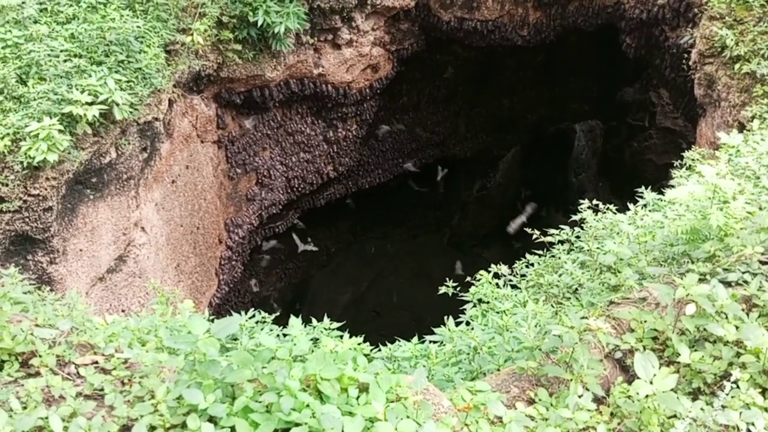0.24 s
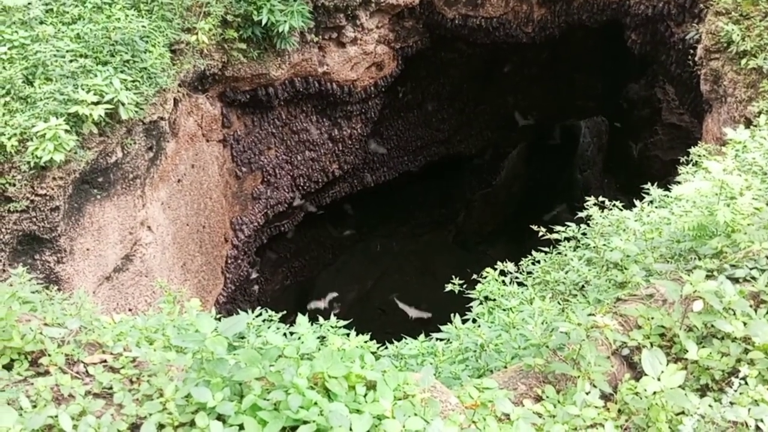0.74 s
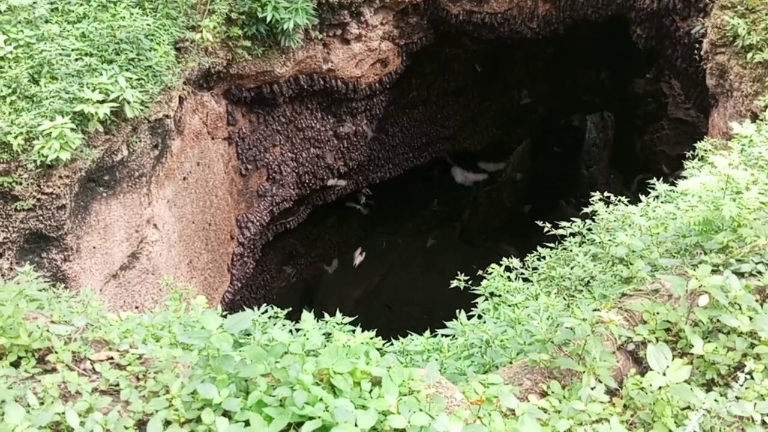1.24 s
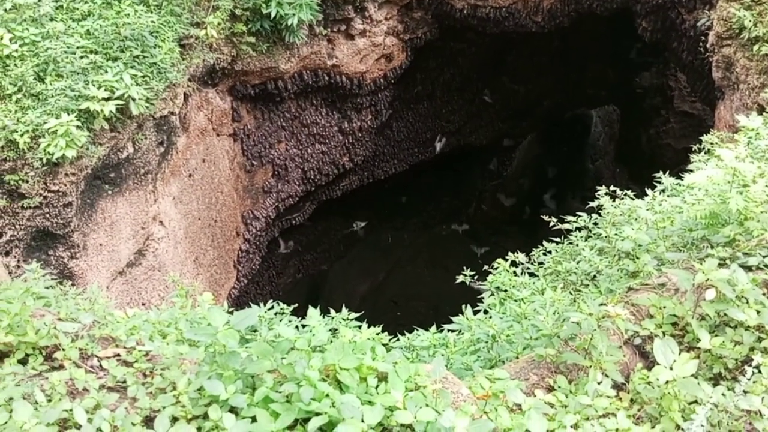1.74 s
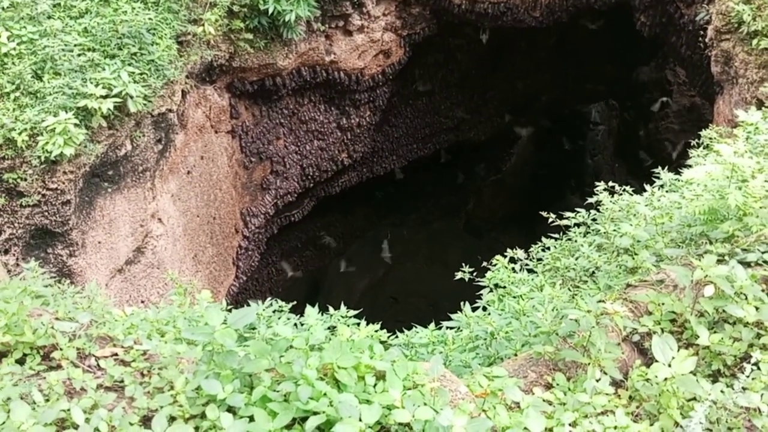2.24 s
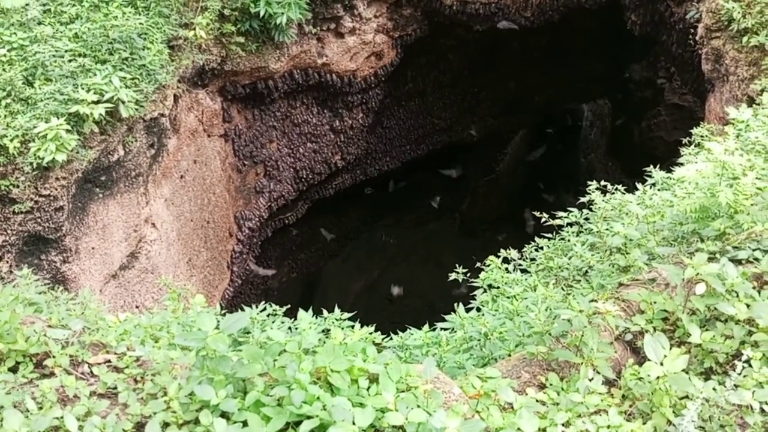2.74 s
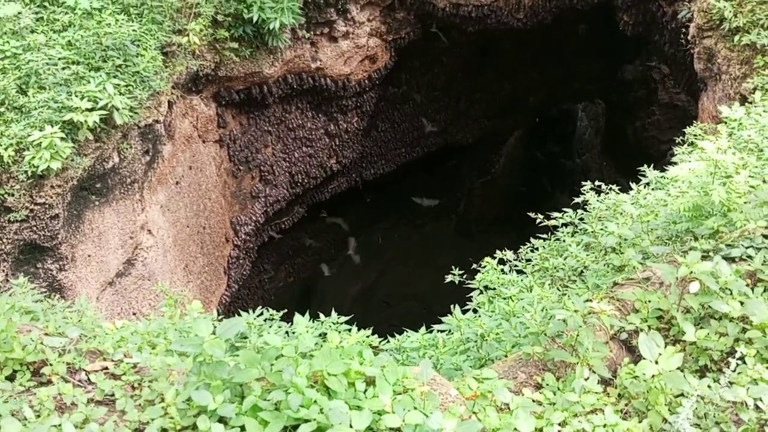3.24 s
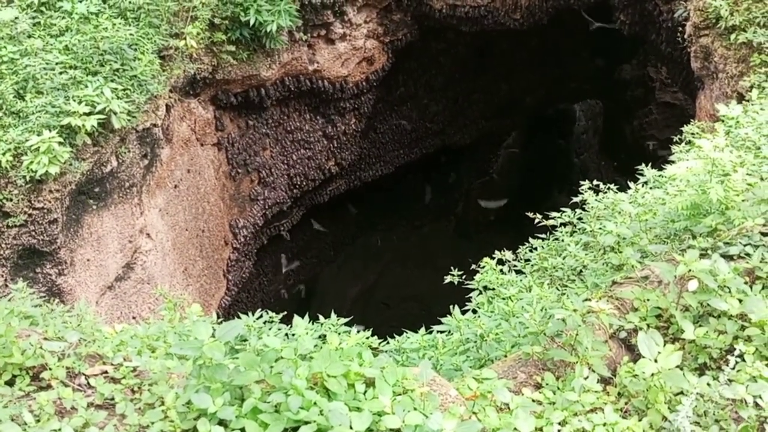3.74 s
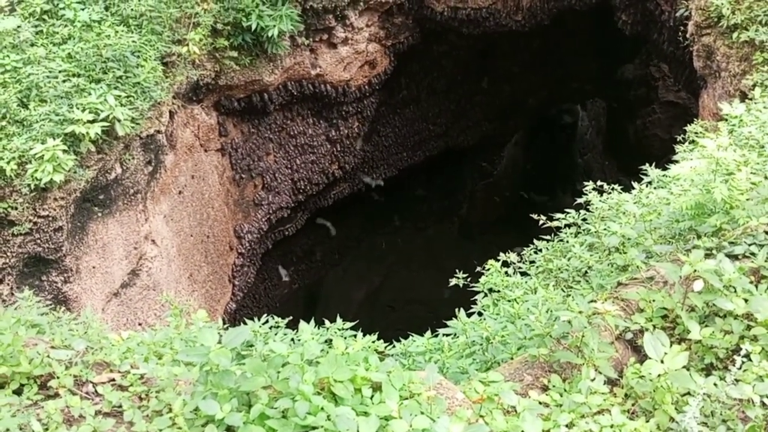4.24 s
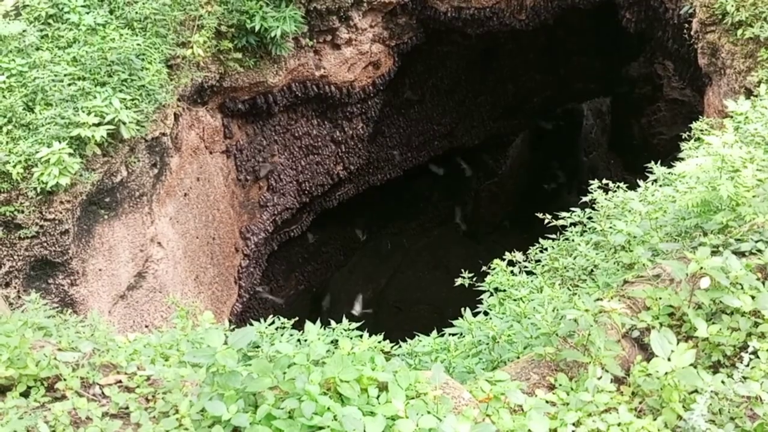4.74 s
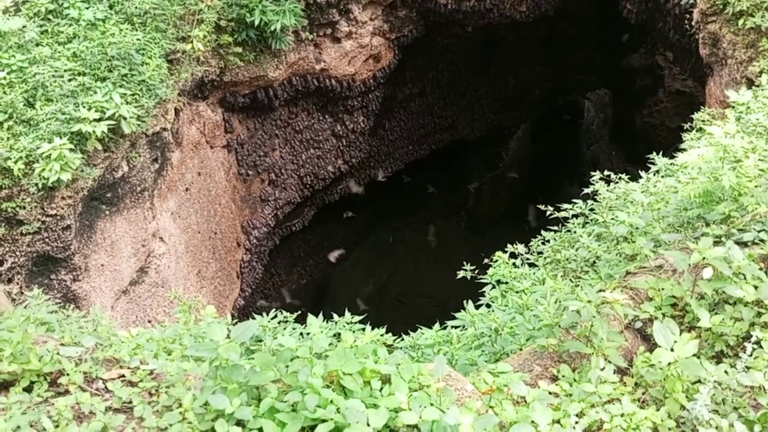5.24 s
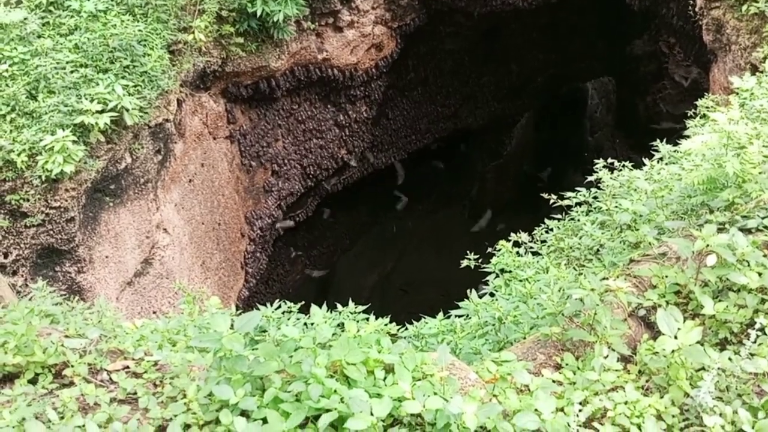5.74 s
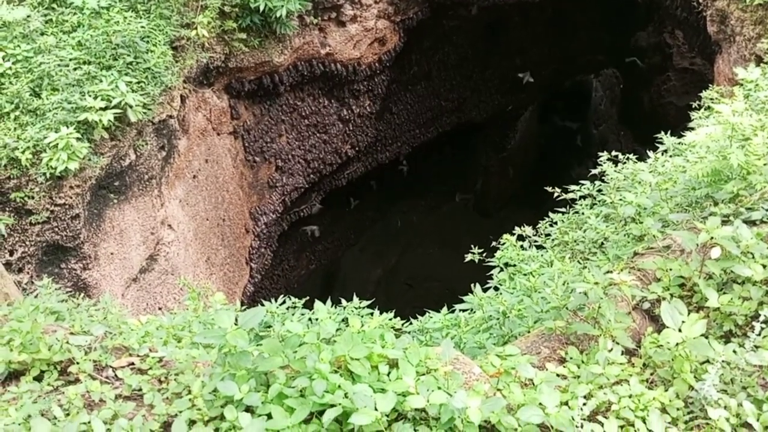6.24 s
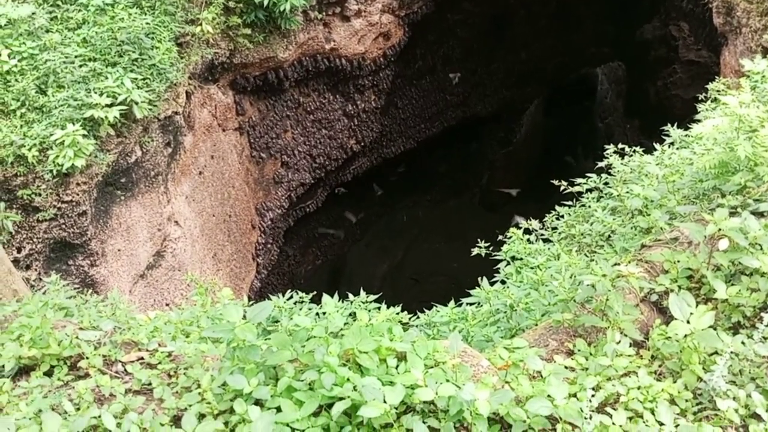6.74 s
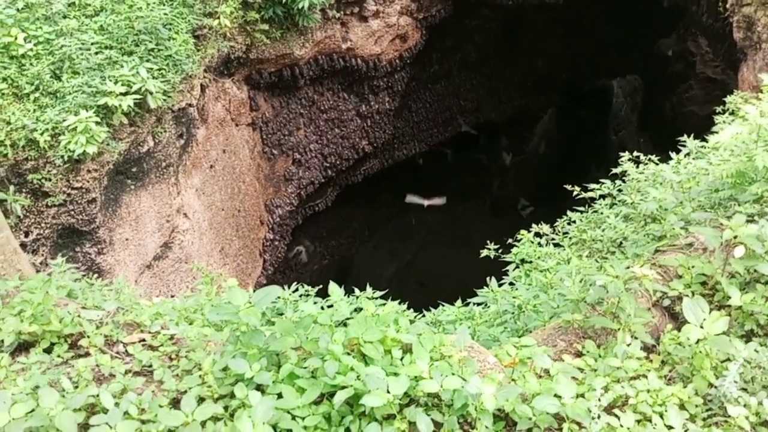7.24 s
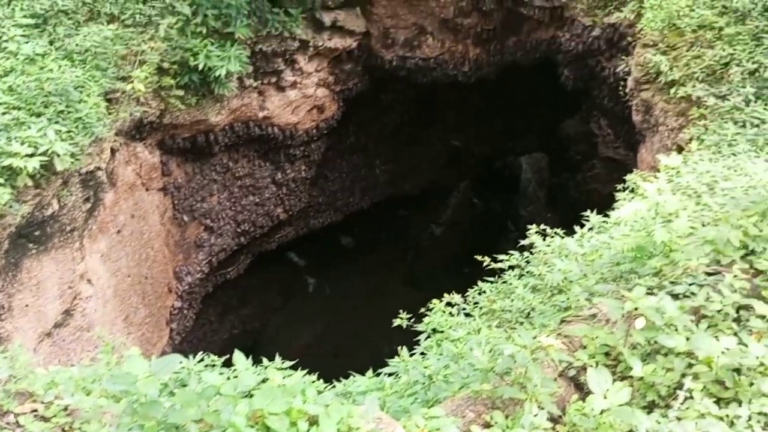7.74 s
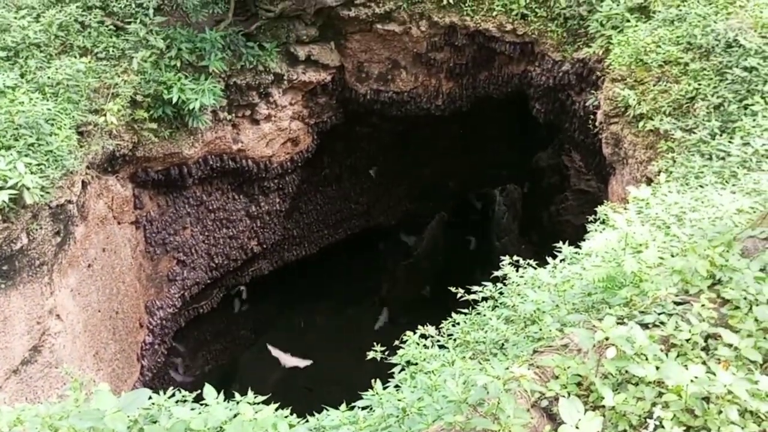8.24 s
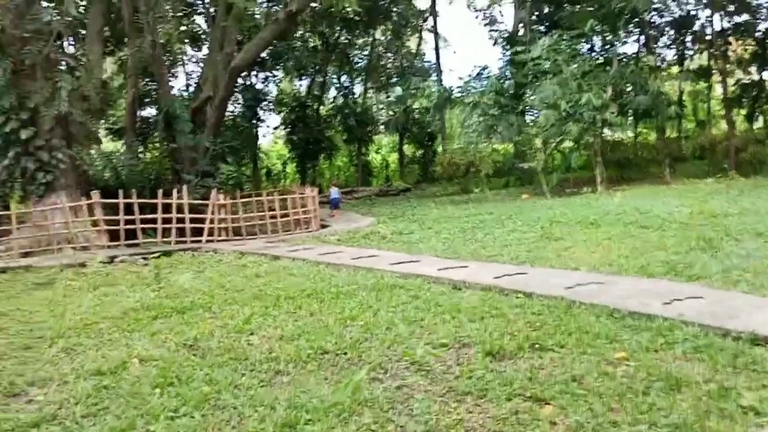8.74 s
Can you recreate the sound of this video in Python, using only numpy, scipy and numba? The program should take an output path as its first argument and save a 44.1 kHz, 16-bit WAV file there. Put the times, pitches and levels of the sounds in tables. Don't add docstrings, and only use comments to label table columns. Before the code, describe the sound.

Thousands of bats screech and twitter in a rocky hollow over faint motor drone; one sharp snap, then the chatter turns duller from further away.

```python
import sys
import numpy as np
from scipy import signal
from scipy.fft import rfft, irfft, next_fast_len
from scipy.io import wavfile
from scipy.ndimage import uniform_filter1d
from numba import njit

SR = 44100
rng = np.random.default_rng(int(sys.argv[2]) if len(sys.argv) > 2 else 0)


def persist_wave(psi):
    counts = np.round(np.clip(psi, -1, 1) * 32767).astype(np.int16)
    wavfile.write(sys.argv[1], SR, np.atleast_2d(counts).T)


def how_loud(loudness_db):
    steps = np.asarray(loudness_db, float) / 20
    return 10 ** steps


N = 395577

T = np.arange(N) / SR
SIZE = next_fast_len(N)
HZ = np.maximum(np.fft.rfftfreq(SIZE, 1 / SR), 1)
TURN_S = 7.15
MOVE_S, LEAVE_S = 8.323, 8.55
FLANK_SHARE = 0.52


def level(x, db):
    return x * how_loud(db) / np.sqrt(np.mean(x ** 2))


def colour(x, points):
    hz, db = np.transpose(points)
    gain = how_loud(np.interp(np.log(HZ), np.log(hz), db))
    return irfft(rfft(x, SIZE) * gain, SIZE)[:N]


def band(x, lo_hz, hi_hz):
    def edge(hz):
        return np.sin(np.pi / 4 * (1 + np.clip(5 * np.log2(HZ / hz), -1, 1))) ** 2

    return irfft(rfft(x, SIZE) * edge(lo_hz) * (1 - edge(hi_hz)), SIZE)[:N]


def walk(rate):
    k = int(SR / rate)
    held = np.repeat(rng.standard_normal(N // 400 + 2)[:N // k + 1], k)
    w = uniform_filter1d(uniform_filter1d(held, k), k)[:N]
    return w / w.std()


def swell(s, length):
    return np.exp(-(2 * (T - s) / length) ** 2)


def echo(x, t60, damp_hz, rise=0.075):
    hop, t = SR // 4, T[:int(.7 * SR)]
    out = np.zeros(len(x) + 2 * SR)
    fade = np.sin(np.pi * np.arange(2 * hop) / (2 * hop))
    padded = np.pad(x, (hop, 2 * hop))
    for i in range(0, len(x) + hop, hop):
        envelope = np.exp(-np.log(1000) * t / t60) * (1 - np.exp(-t / rise))
        tail = rng.standard_normal(len(t)) * envelope
        tail = signal.lfilter([1], [1, -np.exp(-2 * np.pi * damp_hz / SR)], tail)
        tail = tail / np.sqrt(np.sum(tail ** 2))
        rung = signal.fftconvolve(padded[i:i + 2 * hop] * fade, tail)
        out[i:i + len(rung)] += rung
    return out[hop:hop + len(x)]


# f/Hz, level/dB rms
MOTOR_LINES = [(57.9, -66), (71.5, -85), (90.2, -68), (94.2, -56.5), (108.7, -59), (115.7, -67),
               (126.5, -75), (144, -71), (162.8, -59), (172.3, -74), (188.4, -88)]


def motors():
    drift = np.cumsum(1 + 0.00429 * walk(0.649)) / SR
    out = 0
    for hz, db in MOTOR_LINES:
        cycles = hz * drift + .1 * walk(6)
        out = out + np.sqrt(2) * how_loud(db + 2.2 * walk(7)) * np.sin(2 * np.pi * cycles)
    return out


# f/Hz, level/dB per Hz
MURMUR_COLOUR = [(18, -49), (30, -19), (44, -16), (64, -15.5), (97, 4.5), (129, -4.5), (216, -8),
                 (253, -25.5), (424, -29), (489, -28.5), (616, -12.5), (804, 0.5), (978, -4.5), (1320, -14),
                 (2100, -12.5), (2730, -31), (4620, -120)]
# centre t/s, level/dB, length t/s
AIR_HUSHES = [
    (.3, 2, 0.79),
    (2.5, -2, 0.99),
    (3.9, -3, 0.86),
    (5.9, -1.5, 0.26),
    (7.7, -1, .4),
]


def murmur(db):
    air = colour(rng.standard_normal(N), MURMUR_COLOUR)
    air = air / np.std(band(air, 580, 1100))
    boom = how_loud(db + walk(14)) * band(air, 560, 1150)
    around_db = np.select([T < MOVE_S, T < LEAVE_S], [-47.5, -43.5], -48.5) + walk(3.076)
    hush_db = sum(d * swell(s, length) for s, d, length in AIR_HUSHES)
    around = band(air, 223.5, 531) + how_loud(hush_db) * band(air, 1210, 2230)
    rumble = how_loud(-46.5) * band(air, 20, 206.5)
    return boom + how_loud(around_db) * around + rumble


# t/s from its top note, f/Hz, level/dB
WHISTLE_PHRASE = [
    (-.19, 1420, 11),
    (-.135, 1540, 12),
    (-.11, 1490, 10),
    (-.085, 1332, 13),
    (-.04, 1520, 13),
    (0, 1652, 20),
    (.025, 1487, 19),
    (.075, 1220, 14.5),
    (.115, 1026, 8),
]
# top note t/s, pitch factor, level/dB, stretch of the climb, opening f/Hz, falling end level/dB
WHISTLE_CALLS = [
    (-.07, 0.92, -57.5, 0.9, 1393, 1),
    (.545, 0.98, -55.5, .95, 1370, -3),
    (6.285, .93, -59.5, 1.16, 1050, -5),
    (7.125, 1., -56, 0.883, 1440, -9),
    (7.95, 1.025, -56.5, 1.02, 1390, 0.5),
]


def bird(early=0.5):
    s, hz, db = np.transpose(WHISTLE_PHRASE)
    t = np.arange(-int(early * SR), N) / SR
    song = 0
    for top, factor, call_db, slow, first_hz, end_db in WHISTLE_CALLS:
        times = np.where(s < 0, slow * s, s)
        pitch = uniform_filter1d(np.interp(t - top, times, np.r_[first_hz, hz[1:]]), size=600)
        phase = 2 * np.pi * np.cumsum(factor * pitch) / SR
        note_db = db + call_db + end_db * np.clip(s / .075, 0, 1.5)
        loudness = how_loud(np.interp(t - top, times, note_db, -150, -150))
        song = song + uniform_filter1d(loudness, size=500) * np.sin(phase)
    slap = how_loud(-10 + 3.0 * walk(35)) * np.roll(song, int(.04 * SR))[-N:]
    trees = echo(song, 1.2, 6000, rise=.006)[-N:]
    return how_loud(2.4 * walk(45) - 4.5) * song[-N:] + how_loud(-2) * slap + how_loud(-5) * trees


def knock(s, db, hz, width, decay):
    out, t = np.zeros(N), T[:SR // 2]
    edges = [max(hz - width / 2, 40), hz + width / 2]
    sos = signal.butter(2, edges, "bandpass", fs=SR, output="sos")
    noise = level(signal.sosfilt(sos, rng.standard_normal(len(t))), db)
    burst = noise * np.exp(-t / decay) * (1 - np.exp(-t / 0.0071))
    i = int(s * SR)
    out[i:i + len(t)] = burst[:N - i]
    return out


def snap(s, db, from_hz, to_hz, rise):
    t = np.clip(T - s, 0, 40 * rise)
    fall = .7 * rise
    phase = 2 * np.pi * (to_hz * t + (from_hz - to_hz) * fall * (1 - np.exp(-t / fall)))
    return how_loud(db) * t / rise * np.exp(1 - t / rise) * np.sin(phase)


# t/s, peak level/dB, centre f/Hz, width f/Hz, decay t/s
SOFT_KNOCKS = [(1.491, -52, 245, 187, 0.039), (2.781, -56, 247, 144, 0.03), (4.42, -43.5, 230, 177, 0.042),
               (4.551, -73, 315, 302, 0.12), (4.80, -46, 213, 179, 0.081), (4.901, -77, 400, 302, 0.058),
               (6.622, -65, 460, 250, 0.1), (6.9, -89, 348, 300, 0.098), (7.487, -34, 346, 303, 0.0092),
               (7.519, -49, 265, 190, 0.062), (8.12, -61, 392, 350, 0.26), (8.335, -39, 433, 196, 0.017),
               (8.45, -65, 348, 250, 0.11), (8.65, -72, 400, 310, 0.11), (8.876, -42, 428, 150, 0.018),
               (8.94, -53, 330, 202, .04)]
# t/s, peak level/dB, first f/Hz, last f/Hz, rise t/s
FINGER_THUMPS = [
    (4.418, -34, 300, 190, .003),
    (4.7956, -34.5, 298, 190, 0.0044),
]
# t/s, peak level/dB, first f/Hz, last f/Hz, rise t/s
SHARP_SNAP = (7.48712, -3.5, 5500, 800, .00015)
# t/s, peak level/dB, first f/Hz, last f/Hz, rise t/s
GROUND_RETURN = (7.4935, -17, 1630, 250, .0006)


def impacts():
    knocks = sum(knock(*k) for k in SOFT_KNOCKS)
    crack = band(snap(*GROUND_RETURN) - snap(*SHARP_SNAP), 90, 21000)
    thumps = sum(snap(*k) for k in FINGER_THUMPS)
    return knocks + crack - thumps


# t/s, level/dB re usual
COLONY_ACTIVITY = [(0, -0.5), (.12, -1), (1.3, -1), (2.0, 0), (2.8, -0.5), (3.4, 0.8), (4.0, -1),
                   (5.0, 1.1), (5.8, 0), (6.2, -1.5), (6.8, -0.9), (7.3, -2), (8.0, -2), (8.97, -2.5)]
# centre t/s, throat level/dB, length t/s, overtone level/dB
COLONY_SQUABBLES = [(0.603, 1.5, 0.19, 1), (0.726, 0.5, .08, 0), (0.977, 1.5, .15, 0), (1.355, 2, 0.063, 2),
                    (1.533, 2, 0.14, 0), (2.047, 2.5, 0.12, -1), (2.245, 1, .07, -2),
                    (2.425, 2.5, 0.075, 0), (3.125, 2, 0.093, 2), (3.463, 0, 0.092, 1.5),
                    (3.646, 2.5, 0.11, .5), (3.76, -0.5, 0.11, 2.5), (3.941, 7.5, 0.032, .8),
                    (4.065, 3, 0.048, 0), (4.282, 2.5, 0.11, 3), (4.476, 4, 0.095, 0),
                    (5.21, 1.5, 0.09, 2.5), (5.398, 5, 0.036, 3), (5.542, 1.5, 0.082, 2.5),
                    (5.91, 2.5, 0.24, 3), (6.067, 3.5, 0.051, 3), (6.361, 3.5, 0.076, -1),
                    (6.52, 3.5, .1, 1.8), (6.744, 3.5, 0.079, 3), (6.949, 2, 0.11, 3.5), (7.07, 0, 0.11, 3),
                    (7.889, 2, 0.057, 1.5), (8.09, 2.5, 0.13, 1), (8.653, .3, .08, 3), (8.86, 3, 0.072, 0)]
# centre t/s, level/dB, length t/s
WING_LULLS = [
    (1.052, -2.5, 0.29),
    (8.7, -4.5, 0.3),
]
LAWN_CHANGE_DB = (-4.5, -2.5, -2, -2)


def levels():
    busy = np.interp(T, *np.transpose(COLONY_ACTIVITY))
    flare = sum(db * swell(s, length) for s, db, length, _ in COLONY_SQUABBLES)
    shrill = sum(db * swell(s, length) for s, _, length, db in COLONY_SQUABBLES)
    lull = sum(db * swell(s, length) for s, db, length in WING_LULLS)
    aside = 1.5 * np.clip((T - TURN_S) / 0.66, 0, 1)
    throat = -21.5 + busy + FLANK_SHARE * flare
    low = -38 + 0.12 * (busy + flare) + aside
    high = -35 + 0.11 * busy + shrill
    wings = -47.5 + 0.64 * busy + 1.13 * walk(12) + lull
    moved = np.outer(LAWN_CHANGE_DB, T > MOVE_S) + np.outer((-0.8, -2, -1.2, -2.5), T > LEAVE_S)
    duck = -3 * swell(SHARP_SNAP[0], 0.024)
    return flare, np.array([throat, low, high, wings]) + moved + duck


def pulse_chance():
    return np.clip(rng.standard_normal(N), -1.6, 1.6)


@njit
def trills(start, length, rate, hz, width, size, chance, jitter):
    out = np.zeros(len(chance))
    for c in range(len(start)):
        pole = np.exp((2j * np.pi * hz[c] - np.pi * width[c]) / SR)
        z, p, n, i0 = 0j, 0., int(length[c] * SR), int(start[c] * SR)
        for i in range(max(i0, 0), min(i0 + n + 100, len(out) - 1)):
            p += rate[c] / SR
            if p >= 1 and i < i0 + n:
                p = jitter * chance[i]
                z += size[c] * np.sin(np.pi * (i - i0) / n) * np.exp(.35 * chance[i + 1])
            z *= pole
            out[i] += z.imag
    return out


@njit
def glides(start, length, hz0, hz1, size, wobble):
    out = np.zeros(len(wobble))
    for c in range(len(start)):
        p, n, i0 = 0., int(length[c] * SR), int(start[c] * SR)
        for i in range(max(i0, 0), min(i0 + n, len(out))):
            u = (i - i0) / n
            p += 2 * np.pi * (hz0[c] + (hz1[c] - hz0[c]) * u) * (1 + wobble[i]) / SR
            out[i] += size[c] * np.sqrt(np.sin(np.pi * u)) * np.sin(p)
    return out


def crowd(count=4500):
    when, length, rate, hz, width, size = rng.random((count, 6)).T
    size = how_loud(np.minimum(-3.0 * np.log(size), 2.5))
    harsh = trills(when * N / SR, 0.026 + 0.057 * length, 150 + 500 * rate ** 2, 1200 + 16500 * hz,
                   700 + 900 * width, size, pulse_chance(), .15)
    when, length, hz, slide, size = rng.random((count, 5)).T
    hz = 1500 + 15500 * hz
    last_hz = hz * (1 + 0.198 * (slide - .55))
    size = how_loud(np.minimum(-3.0 * np.log(size), 7))
    thin = glides(when * N / SR, 0.01197 + 0.02985 * length, hz, last_hz, size, 0.0041 * walk(90))
    calls = level(harsh, -5.5) + level(thin, -9.5)
    blur = level(rng.standard_normal(N), -3)
    return calls + how_loud(-4) * echo(calls, .6, 15000) + blur


# f/Hz, level/dB per Hz
RIM_SPECTRUM = [(1120, -63.5), (1900, -27), (2280, -27), (2800, -23), (3850, -22.5), (4740, -13),
                (6850, -4.5), (7050, -8), (9900, -24.5), (11200, -23), (15500, -24.5)]
# f/Hz, level/dB per Hz
LAWN_SPECTRUM = [(1900, -15), (2600, -14), (3500, -8), (4400, -4.5), (6000, -3), (7200, -1.5), (8800, -11),
                 (11000, -13.5), (13000, -17.5), (15600, -18)]


def colony(throat_db, flare_db, low_db, high_db):
    voices, out = crowd(), 0
    bands = ((2100, 4300, low_db, MOVE_S), (4300, 9900, throat_db, MOVE_S), (9900, 16500, high_db, TURN_S))
    for lo, hi, db, change_s in bands:
        rim = level(band(colour(voices, RIM_SPECTRUM), lo, hi), 0)
        lawn = level(band(colour(voices, LAWN_SPECTRUM), lo, hi), 0)
        out = out + how_loud(db + 0.21 * walk(25)) * np.where(T < change_s, rim, lawn)
    core = (how_loud((1 - FLANK_SHARE) * flare_db) - 1) * band(out, 5700, 7500)
    sheen_db = 2.5 * np.clip((T - 6.7) / .3, 0, 1) * (T < MOVE_S)
    sheen = (how_loud(sheen_db) - 1) * band(out, 7900, 9700)
    return out + core + sheen


# t/s, length t/s, first f/Hz, last f/Hz, level/dB rms
CLEAR_SQUEAKS = [(0.106, .04, 5620, 5480, -28), (0.107, 0.022, 5150, 5250, -24),
                 (0.136, 0.035, 5200, 5260, -23), (.165, 0.032, 5300, 4800, -24),
                 (0.356, .02, 5670, 5740, -24.5), (0.395, 0.048, 5520, 5450, -29),
                 (.55, .025, 5000, 5000, -31), (2.875, .022, 6300, 6120, -23.5),
                 (2.9, .022, 6350, 6150, -24), (2.035, 0.037, 6070, 6300, -26),
                 (3.421, .025, 6000, 6100, -20.5), (4.27, .04, 7900, 8200, -33),
                 (4.3, 0.076, 8200, 7800, -31), (4.937, 0.1, 7170, 7840, -27), (6.9, 0.07, 6200, 5900, -25),
                 (7.09, 0.038, 8700, 8500, -38), (5.135, .035, 6900, 6850, -23),
                 (3.925, .04, 6400, 5600, -25), (4.49, .03, 6600, 6500, -24), (7.69, .05, 5540, 5500, -33),
                 (8.033, .049, 5000, 5700, -41), (8.015, .04, 7200, 7900, -31),
                 (8.05, .02, 7950, 7700, -33), (8.015, .04, 6000, 6600, -27),
                 (8.055, .035, 6750, 6400, -27), (8.401, 0.11, 4660, 4300, -38),
                 (8.755, .025, 3260, 3460, -39), (8.791, .03, 3430, 3400, -40),
                 (8.83, .03, 3350, 3200, -38)]
# t/s, length t/s, first f/Hz, level/dB rms
LOW_CRIES = [
    (0.69, .04, 3300, -49),
    (1.70, 0.19, 3050, -48),
    (1.84, 0.096, 2650, -47),
    (2.06, 0.12, 3270, -41),
    (2.2, .14, 2380, -48),
    (2.17, 0.08, 2800, -43),
    (4.00, 0.061, 2200, -45),
    (8.06, 0.086, 3200, -46),
    (4.87, 0.088, 1500, -54),
]
# t/s, length t/s, first f/Hz, level/dB rms
HIGH_PEEPS = [(1.66, 0.044, 11700, -41), (2.416, .044, 15100, -39), (3.724, 0.055, 11800, -40),
              (5.57, 0.047, 13400, -39), (6.41, 0.078, 14700, -45), (6.45, .05, 9800, -44),
              (6.753, 0.04, 12200, -38), (6.76, 0.035, 13300, -36), (7.075, .035, 13500, -40),
              (3.05, .035, 12800, -41), (3.765, .03, 10600, -38), (5.21, .04, 12700, -39)]


def squeaks():
    cries = [(s, n, hz, hz + 2210 * n, db) for s, n, hz, db in LOW_CRIES]
    peeps = [(s, n, hz, hz - 5000 * n, db) for s, n, hz, db in HIGH_PEEPS]
    return np.transpose(CLEAR_SQUEAKS + cries + peeps)


# t/s, peak level/dB, throat f/Hz, length t/s, pulse f/Hz
NEAR_TRILLS = [(0.4858, -7, 6920, 0.068, 240), (1.453, -7, 6580, 0.07, 280), (1.87, -6, 6550, 0.06, 330),
               (2.0872, -13, 6870, 0.052, 380), (2.42, -8, 6200, 0.067, 270),
               (3.1994, -5, 6900, 0.066, 240), (3.423, -5, 6000, 0.086, 240), (3.707, -5, 6250, 0.11, 290),
               (3.907, -7, 6150, 0.055, 280), (4.24, -17, 6350, 0.06, 270), (4.474, -5, 6900, 0.051, 200),
               (5.373, -21, 6640, 0.06, 200), (5.5104, -18, 6350, 0.055, 230),
               (5.924, -12, 7000, 0.067, 210), (6.0696, -14, 6740, 0.065, 240), (6.72, -9, 7300, 0.06, 240),
               (2.66, -10, 6500, .06, 260), (5.83, -10, 7800, .06, 260), (6.56, -10, 7900, .06, 240)]


def near_bats():
    s, db, hz, length, rate = np.transpose(NEAR_TRILLS)
    chance = pulse_chance()
    harsh = 0
    for k, gain_db in ((1, -9.5), (1.85, -15)):
        width = 0 * hz + 1500 * k
        harsh = harsh + trills(s - .01, length, rate, k * hz, width, how_loud(db + gain_db), chance, .2)
    s, length, hz0, hz1, db = squeaks()
    thin = how_loud(2.2 * walk(70)) * glides(s, length, hz0, hz1, 1.4 * how_loud(db), .005 * walk(70))
    calls = band(harsh, 2360, 16000) + thin
    return calls + how_loud(-11) * echo(calls, .22, 12000)


def scene():
    flare_db, (throat_db, low_db, high_db, wings_db) = levels()
    background = motors() + murmur(wings_db) + bird() + impacts()
    mono = background + colony(throat_db, flare_db, low_db, high_db) + near_bats()
    return np.array([mono, mono])


# f/Hz, level/dB re usual
GATE_LIMIT = [(230, -9), (310, 3), (520, -1), (640, -9), (1050, -10), (1230, 1.5), (1500, -2.5), (1900, -2),
              (2200, -9), (2600, -25)]


def gate(x):
    hz, _, z = signal.stft(x, SR, nperseg=2048)
    power = uniform_filter1d(np.abs(z) ** 2, size=3, axis=0)
    power = uniform_filter1d(power, size=3, axis=1).clip(1e-20)
    patches = uniform_filter1d(rng.standard_normal(z.shape), size=4, axis=0)
    patches = uniform_filter1d(patches, size=2, axis=1)
    usual = np.median(power, axis=1, keepdims=True)
    limit_db = np.interp(hz, *np.transpose(GATE_LIMIT), -150, -150)[:, None] + 10 * patches
    limit = how_loud(limit_db) ** 2 * usual
    keep = (hz < 15730)[:, None] / (1 + (limit / power) ** 4)
    return signal.istft(z * keep, SR, nperseg=2048)[1][:N]


# t/s, lower f/Hz, upper f/Hz
SIDE_PATCHES = [(.265, 14450, 15700), (.405, 4130, 5250), (.474, 5500, 7580), (.474, 9650, 11000),
                (.776, 6900, 9000), (.776, 13100, 15100), (.822, 5100, 6450), (.822, 10350, 12400),
                (1.403, 6900, 9000), (1.728, 11700, 13800), (2.75, 4130, 5250), (2.75, 8270, 9650),
                (2.75, 11000, 13100), (2.842, 5100, 6450), (3.237, 7500, 9000), (3.702, 4570, 6450),
                (3.725, 4570, 6450), (4.143, 4130, 5770), (4.329, 8270, 10350), (4.329, 5100, 6450),
                (4.329, 11000, 12400), (4.399, 7500, 9650), (4.933, 4130, 5250), (4.933, 14450, 15700),
                (5.675, 11000, 12400), (5.675, 13100, 14450), (6.418, 4570, 7050), (6.418, 10350, 12400),
                (6.605, 8270, 11700), (6.605, 14450, 15700), (7.022, 6200, 7580), (7.068, 6900, 8350),
                (7.068, 4130, 5250), (7.255, 11700, 13100), (7.626, 13800, 15150), (7.742, 5500, 8350),
                (7.766, 8900, 10350), (8.044, 9650, 11700), (8.438, 12400, 14450), (8.438, 10350, 11700),
                (8.578, 5500, 6950), (8.578, 13800, 15700), (8.717, 5500, 7580), (8.717, 10350, 11700)]


def split(mono):
    frame, grid = 1024, 430
    n = np.arange(2 * frame) + .5
    window = np.sin(np.pi * n / (2 * frame))
    side, other = np.zeros(N), np.roll(mono, SR // 10)
    for s, lo, hi in SIDE_PATCHES:
        i = grid + frame * (round((s * SR - grid) / frame) - 1)
        bins = np.arange(int(lo * 2 * frame / SR), int(hi * 2 * frame / SR)) + .5
        waves = window[:, None] * np.cos(np.pi / frame * np.outer(n + frame / 2, bins))
        side[i:i + 2 * frame] += waves @ (other[i:i + 2 * frame] @ waves) * 2 / frame
    return how_loud(-4) * side


def low_pass(x):
    return signal.sosfilt(signal.butter(12, 17010, fs=SR, output="sos"), x)


def record(dry):
    mono = gate(dry[0])
    side = split(mono)
    return low_pass(mono + np.array([side, -side]))


dry = scene()
out = record(dry)
persist_wave(out)
```